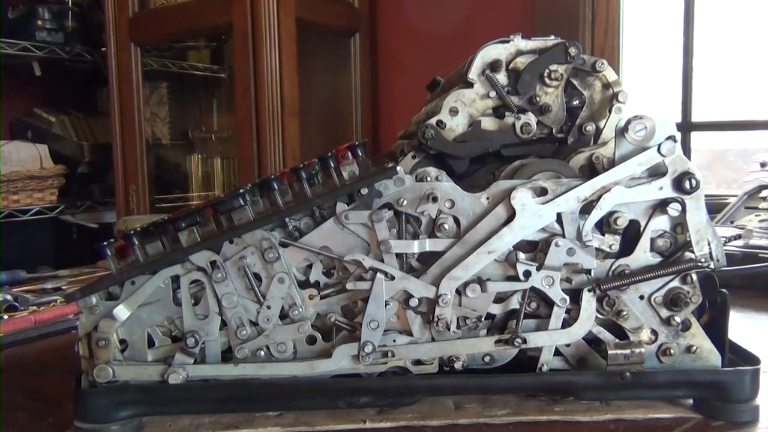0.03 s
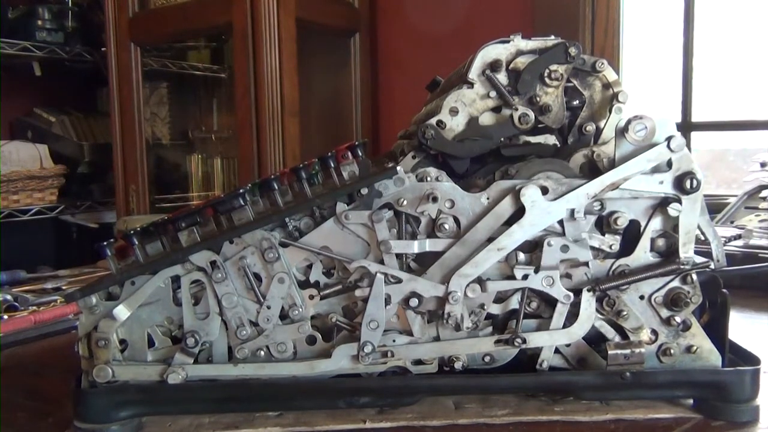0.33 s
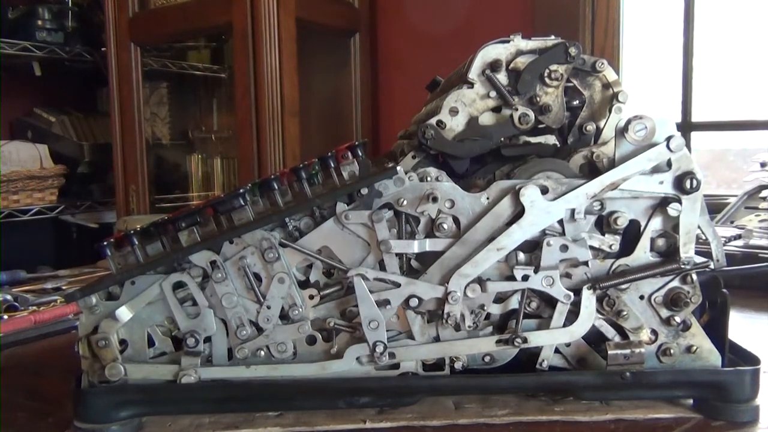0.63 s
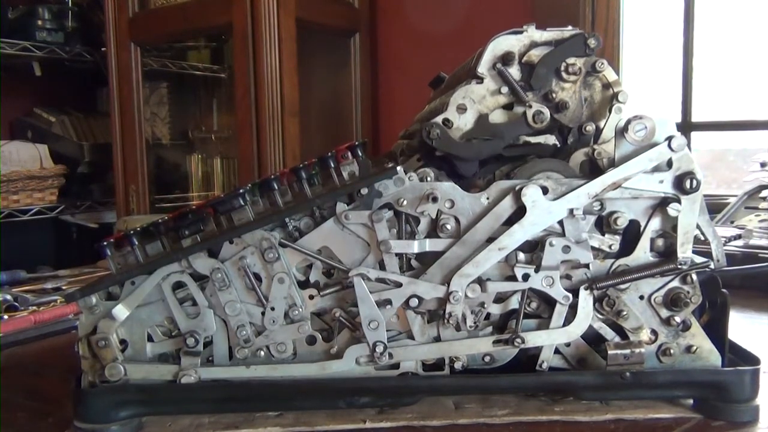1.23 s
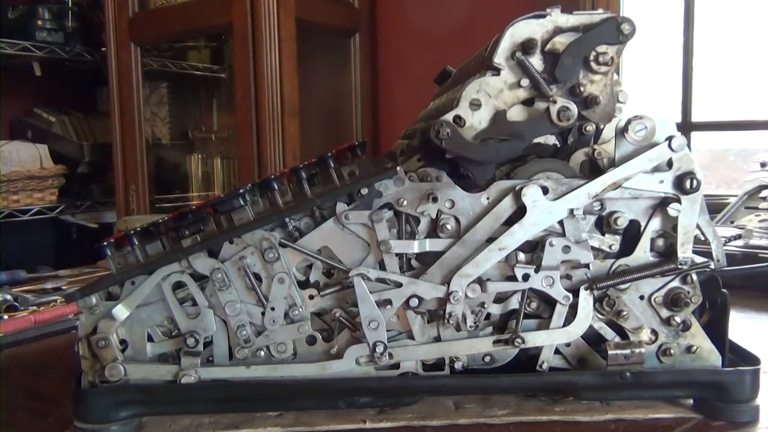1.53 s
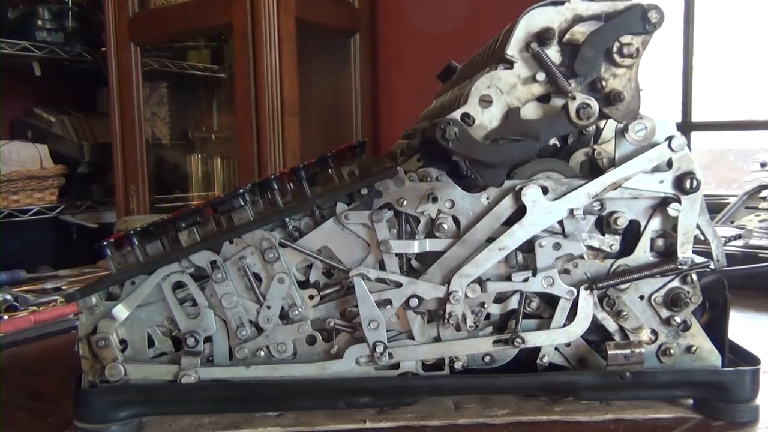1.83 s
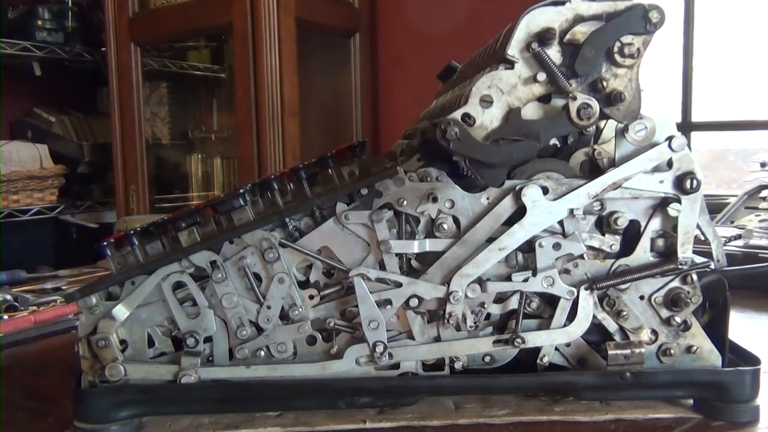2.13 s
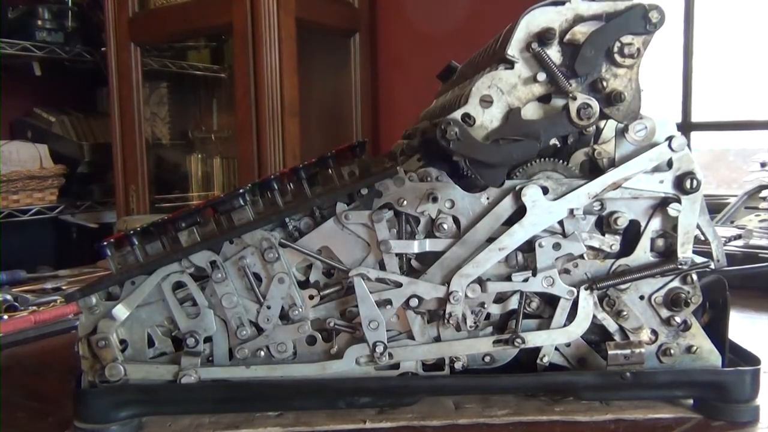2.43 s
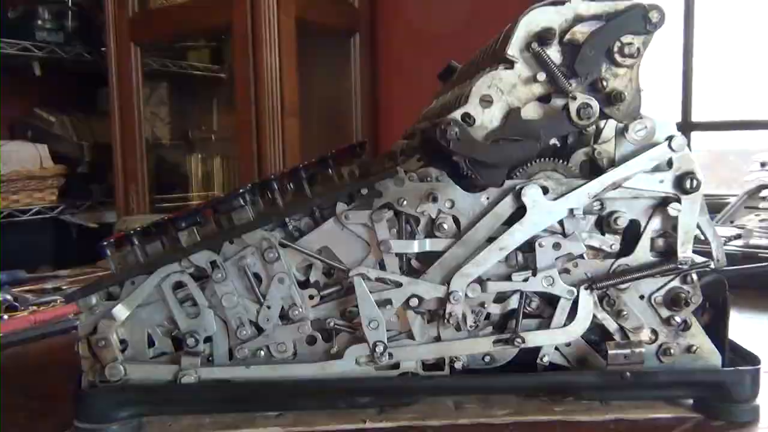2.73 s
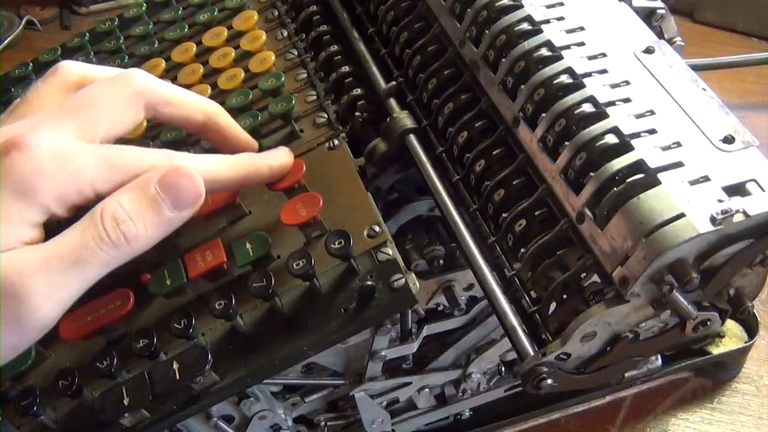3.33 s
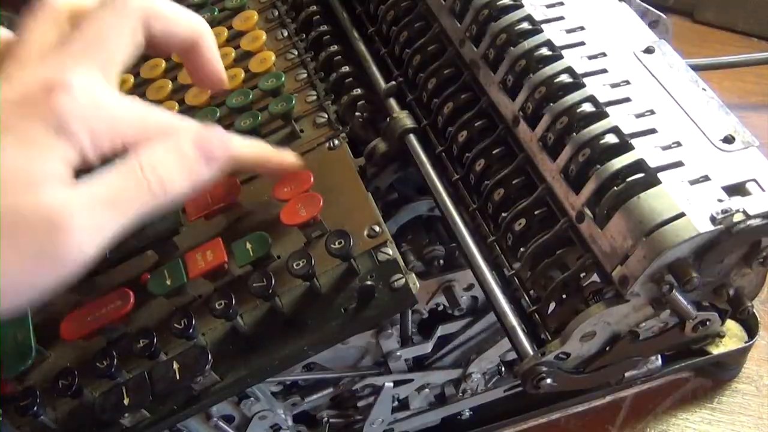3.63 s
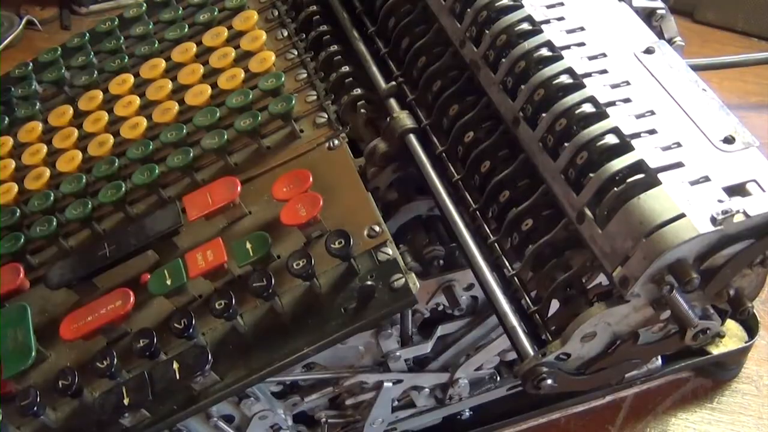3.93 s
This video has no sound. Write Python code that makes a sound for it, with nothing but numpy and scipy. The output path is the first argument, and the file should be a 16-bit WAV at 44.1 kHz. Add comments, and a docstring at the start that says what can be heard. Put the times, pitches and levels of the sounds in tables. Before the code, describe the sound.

A motor-driven mechanical calculator clatters close by in a quiet room, with snapping latches, knocking levers and churning gears. It winds down with ratchet ticks and a faint falling whine, pauses, then clatters again after a key press.

```python
"""Four quick counting strokes from a motor-driven mechanical calculator, cover off, close, in a quiet room.
Pawls rattle over the number wheels, latches snap and levers hit their stops over churning gears and a
booming frame. The carriage cycles, then the drive coasts to rest on a ticking ratchet with a falling whine.
Heard next from above the keys instead of from the side, it is set off by a key press and clatters on."""
import sys
import numpy as np
from scipy import signal
from scipy.fft import rfft, irfft
from scipy.io import wavfile
from scipy.ndimage import uniform_filter1d

SR = 44100
rng = np.random.default_rng(int(sys.argv[2]) if len(sys.argv) > 2 else 0)


def master(y):
    """Save y as 16-bit WAV."""
    cut = np.clip(np.atleast_2d(y).T, -1, 1)
    pcm = np.round(cut * 32767)  # scale
    wavfile.write(sys.argv[1], SR, pcm.astype(np.int16))


N = 176400
T, HZ = np.arange(N) / SR, np.fft.rfftfreq(N, 1 / SR)
ABOVE_FROM_S = 2.826  # listener: side before, above after
PAN_DB, WIDTH = -0.95, 0.12

# counting strokes, carriage cycles (time [s], level [dB])
COUNT_STROKES = [(0.0322, -4.5), (0.0809, -2), (0.1331, -1.5), (0.1846, -1.5)]
CARRIAGE_CYCLES = [(1.1585, -0.5), (1.2631, 2), (1.3649, 2), (1.4671, 3), (1.5714, 3), (1.6751, 1.5),
                   (1.7741, 1)]
# runs of blows within each (delay [s], length [s], relative level [dB])
COUNT_RUNS = [(-.0055, 0.0022, -19), (0, 0.00082, -13.5), (0.014, 0.0068, -19.5), (0.018, 0.0055, -19.5)]
CARRIAGE_RUNS = [(0, .001, -17.5), (.0055, .002, -18), (0.0143, .001, -20), (.028, .004, -24.5),
                 (.037, .014, -24.5), (.066, .008, -22.5), (0.076, 0.012, -23)]
# pawls over the number wheels (time [s], length [s], relative level [dB])
PAWL_RUNS = [(.233, 0.017, -17.5), (.253, .03, -17), (.283, 0.033, -21.5), (.312, 0.065, -26),
             (.359, 0.0048, -17), (.425, 0.019, -21), (.45, 0.026, -20), (.478, 0.023, -20.5),
             (.503, 0.033, -17), (.538, 0.038, -21), (.572, 0.016, -21), (.599, 0.015, -19),
             (.639, 0.026, -20.5), (.684, 0.014, -21.5), (.793, 0.012, -17.5), (.806, 0.026, -22.5),
             (.829, 0.015, -18), (.848, 0.018, -25), (.867, 0.019, -23), (.983, 0.0069, -19.5),
             (1.032, 0.028, -18.5), (1.049, 0.014, -18.5), (1.078, 0.03, -22), (1.127, 0.021, -18.5),
             (1.85, 0.011, -20), (1.869, 0.0084, -16.5), (3.483, .004, -27.5), (3.494, 0.0054, -25.5),
             (3.5225, 0.021, -15), (3.554, 0.0086, -19), (3.569, 0.019, -19), (3.668, 0.042, -25.5),
             (3.704, 0.0042, -23.5), (3.752, 0.033, -19.5), (3.806, 0.031, -19.5), (3.839, 0.03, -16.5),
             (3.877, 0.032, -19.5), (3.908, 0.05, -19), (3.96, 0.0077, -22), (3.991, 0.012, -19.5)]
# latches snapping home (time [s], relative level [dB])
LATCH_SNAPS = [(0.306, -9), (0.3664, -6), (0.395, -14), (0.4168, 0.5), (0.4349, -10), (0.46, -3),
               (0.4659, -12), (0.5862, -1), (0.5892, -3), (0.625, -3), (0.636, 0.5), (0.6584, -15),
               (0.667, 0), (0.7128, -9.5), (0.7513, -12), (0.776, -10), (0.8016, -12), (0.815, -1),
               (0.8905, -12), (0.8992, -7), (0.9044, -17), (0.934, -13), (0.949, -4), (0.959, -15),
               (0.998, -13), (1.02, -0.5), (1.046, -12), (1.0877, -3), (1.299, -7), (1.342, -4),
               (1.8097, -4), (3.5129, -0.5), (3.6214, -14), (3.63, -2), (3.6424, -1.5), (3.7114, -4),
               (3.7203, -18), (3.7303, -7), (3.7415, -7), (3.7778, 1.5), (3.788, -4), (3.7978, -4),
               (3.9376, -9), (3.9427, -3), (3.949, -9), (3.973, 1)]
# steel spectra (frequency [Hz], relative gain [dB])
STEEL_SIDE_EQ = [(300, -18), (1200, -9), (2400, -11), (3600, -8), (4400, -7), (6000, -1.5), (7000, -1.5),
                 (7900, 3), (9200, 0.5), (10500, 1.5), (11700, 1), (13300, -3), (14500, -7), (16000, -12)]
STEEL_ABOVE_EQ = [(300, -8.5), (1200, -17.5), (2200, -13), (3400, -5.5), (4500, -5.5), (6000, -2.5),
                  (7200, -2.5), (8600, -1), (10000, 3), (11200, -1.5), (13000, -2), (14500, -7),
                  (16000, -14)]


def clatter(latch_db=-14, cycle_slip=.07, cycle_scatter_db=1.5):
    """Counting strokes, carriage cycles, pawls and latches strike small steel parts."""
    runs = PAWL_RUNS + [(s + delay, length, db + run_db)
                        for s, db in COUNT_STROKES for delay, length, run_db in COUNT_RUNS]
    for s, db in CARRIAGE_CYCLES:
        for delay, length, run_db in CARRIAGE_RUNS:
            slip, force = rng.standard_normal(2)
            runs.append((s + delay * (1 + cycle_slip * slip), length,
                         db + run_db + cycle_scatter_db * force))
    blows = [(s, db + latch_db) for s, db in LATCH_SNAPS]
    blows += [blow for run in runs for blow in rattle(*run)]
    steel = strike(blows, steel_parts(crack_s=0.00058, ring_t60_s=0.01, ring_db=-3.5, rise_s=0.0008))
    side = linkage(steel * (T < ABOVE_FROM_S), shiver_db=-9)
    above = linkage(steel * (T >= ABOVE_FROM_S), shiver_db=-6.5)
    return colour(side, STEEL_SIDE_EQ) + colour(above, STEEL_ABOVE_EQ)


def rattle(start_s, length_s, db, gap_s=.0024, scatter_db=2.5, fade_db=-3, trim_db=1, count=24):
    """Uneven run of fading blows; a very short run is one blow."""
    jitter, scatter = rng.uniform(-.5, .5, count), rng.standard_normal(count)
    later = np.arange(count) > 0
    delay_s = gap_s * (np.arange(count) + jitter * later)
    blow_db = db + trim_db + scatter_db * scatter * later + fade_db * delay_s / length_s
    return list(zip(start_s + delay_s, np.where(delay_s < length_s, blow_db, -np.inf)))


def steel_parts(crack_s, ring_t60_s, ring_db, rise_s, count=64, pan_scatter_db=1.5, size=2400):
    """Bank of parts, each answering a blow with a short crack and its own 26 modes."""
    t, bank = np.arange(size) / SR, []
    rise = 1 - np.exp(-(t / rise_s) ** 2)
    for _ in range(count):
        pitch, life, strength, phase = rng.random((4, 26, 1))
        hz, t60_s = 500 + 15500 * pitch, ring_t60_s * 2 ** (2 * life - 1)
        modes = strength ** 2 * amp(-60 * t / t60_s) * np.sin(2 * np.pi * (hz * t + phase))
        crack = rng.standard_normal((2, size)) * np.exp(-t / crack_s)
        ring = np.array([modes.sum(0), (modes * rng.choice([-1, 1], (26, 1))).sum(0)])
        mid, side = unit(crack * rise) + amp(ring_db) * unit(ring * rise)
        pan_db = PAN_DB - pan_scatter_db * rng.standard_normal()
        bank.append(unit(spread(mid, side, WIDTH)) * balance(pan_db) * np.sqrt(100 / size))
    return bank


def strike(blows, bank, delay_s=.0012):
    """Each blow (time [s], level [dB]) hits a random steel part and clicks 1.2 ms after its time."""
    out = np.zeros((2, N))
    for (s, db), k in zip(blows, rng.integers(0, len(bank), size=20000)):
        add(out, s + delay_s, amp(db) * bank[k])
    return out


def linkage(x, shiver_db, t60_s=0.045, size=3000):
    """Blows shiver through neighbouring rods and springs."""
    tail = spread(*rng.standard_normal((2, size)), WIDTH) * amp(-60 * np.arange(size) / SR / t60_s)
    shiver = signal.oaconvolve(x, tail / np.linalg.norm(tail[0]), axes=1)[:, :N]
    return (x + amp(shiver_db) * shiver) / np.sqrt(1 + amp(shiver_db) ** 2)


# lever blows, finger on the key (time [s], level [dB])
LEVER_BLOWS = [(.044, -26), (.102, -25.5), (.15, -26), (.2, -21), (.277, -20.5), (.332, -22), (.36, -27),
               (.558, -17), (.604, -26), (.688, -22), (.83, -20.5), (.982, -22), (1.129, -20.5),
               (1.264, -16), (1.30, -18.5), (1.469, -24), (1.54, -18.5), (1.643, -22.5), (1.742, -21),
               (1.776, -19), (3.574, -21.5), (3.705, -21.5), (3.714, -27), (3.778, -18.5), (3.889, -14),
               (3.915, -17)]
KEY_TOUCHES = [(3.453, -45)]
# ringing lever (frequency [Hz], level [dB], T60 [s])
LEVER_MODES = [(2380, -19, .055), (2490, -21, .055), (4950, -23, .07)]
# lever spectrum (frequency [Hz], relative gain [dB])
LEVER_EQ = [(150, -23), (500, -5), (1200, 1), (1800, 5.5), (2400, -2.5), (3600, 8), (5500, 0.5),
            (8000, -12), (16000, -35)]


def levers(clank_s=3.889):
    """Heavy levers hit their stops and a finger touches a key: dull blows. One lever rings on."""
    bank = steel_parts(crack_s=0.0036, ring_t60_s=0.066, ring_db=0, rise_s=0.00025, count=24)
    knocks = colour(strike(LEVER_BLOWS + KEY_TOUCHES, bank), LEVER_EQ)
    return knocks + ringing([(clank_s, 0)], LEVER_MODES)


# ratchet ticks (time [s], relative level [dB])
RATCHET_TICKS = [(1.9243, -18.5), (1.9347, -21), (1.939, -26), (1.945, -18), (1.9531, -23), (1.9663, -20),
                 (1.9747, -21), (1.996, -25), (2.0005, -22), (2.005, -22), (2.0091, -20), (2.0142, -20),
                 (2.029, -21), (2.0336, -20.5), (2.0406, -21), (2.057, -24), (2.0603, -27), (2.0682, -26),
                 (2.075, -31), (2.0888, -24), (2.097, -20), (2.1032, -25), (2.1207, -22), (2.1289, -19.5),
                 (2.1368, -26), (2.14, -21.5), (2.1464, -33), (2.1592, -36), (2.1661, -36), (2.1732, -25.5),
                 (2.1805, -32), (2.1866, -27), (2.1902, -26), (2.1938, -27), (2.2028, -27), (2.216, -21),
                 (2.2274, -23), (2.2364, -30), (2.2502, -20), (2.2595, -25), (2.2688, -34), (2.277, -30),
                 (2.2844, -32), (2.2881, -24.5), (2.294, -21), (2.3164, -37), (2.325, -37), (2.335, -31),
                 (2.3468, -28), (2.36, -28), (2.3704, -37), (2.3918, -26.5), (2.4026, -36)]
# tick spectrum (frequency [Hz], relative gain [dB])
TICK_EQ = [(500, -11.5), (2500, -27), (3700, -3.5), (4100, -12), (4450, -3), (5000, -7), (5740, -1.5),
           (6800, -8), (7520, 1.5), (8700, 2.5), (9600, -9), (10600, -6), (12000, -10), (13100, -14),
           (14000, -12), (15000, -31)]
# pawl ring (frequency [Hz], level [dB], T60 [s])
RATCHET_MODES = [(5720, -22, .02), (7600, -15, 0.024)]


def ratchet(crack_s=0.00053, rise_s=.0003, crack_db=14.5, size=512):
    """One light pawl ticks and rings as the shaft coasts."""
    t, ticks = np.arange(size) / SR, np.zeros((2, N))
    envelope = np.exp(-t / crack_s) * (1 - np.exp(-(t / rise_s) ** 2))
    for s, db in RATCHET_TICKS:
        spectrum = rfft(rng.standard_normal((2, size)) * envelope)
        crack = irfft(spectrum / abs(spectrum))[:, :size // 2]  # whitened: same colour every tick
        add(ticks, s, amp(db + crack_db) * spread(*crack, WIDTH))
    cracks = colour(linkage(ticks, shiver_db=-9), TICK_EQ)
    return (cracks + ringing(RATCHET_TICKS, RATCHET_MODES)) * balance(2 * PAN_DB)


# gear churn, one list per motor run (time [s], level [dB])
GEAR_LEVELS = [
    [(0, -24.5), (.22, -27), (.3, -27.5), (.37, -26.5), (.39, -29), (.45, -27.5), (.66, -26.5), (.73, -30),
     (.775, -29), (.8, -28), (.86, -27), (.94, -25.5), (1.015, -33), (1.06, -28.5), (1.12, -22.5),
     (1.85, -23.5), (1.91, -27.5), (2, -31.5), (2.15, -36), (2.3, -42.5), (2.42, -50), (2.46, -80)],
    [(3.478, -56), (3.485, -27.5), (3.505, -32.5), (3.53, -28), (3.63, -23), (3.71, -24.5), (3.74, -30.5),
     (3.8, -25), (3.9, -25.5), (3.955, -30.5), (4, -21.5)],
]
# gear spectra (frequency [Hz], relative gain [dB])
GEAR_SIDE_EQ = [(100, -18), (350, -10.5), (480, -4), (600, 0), (750, -2.5), (1200, 0.5), (1850, 0.5),
                (2250, -4), (2700, -2.5), (3500, 2.5), (4300, -0.5), (5800, 3), (6900, 1.5), (7700, 5),
                (9600, -1), (11000, 1.5), (13000, -9), (15000, -12), (16000, -22)]
GEAR_ABOVE_EQ = [(100, -5), (400, 4), (750, -1), (1250, 4.5), (2000, -3), (2500, -1.5), (3400, 6),
                 (4500, -1), (6000, 2), (7200, -1), (8200, 6.5), (10000, 0), (11500, 3.5), (13000, -1),
                 (14500, -8), (16000, 2.5)]
# dulling of the slowing gears (time [s], treble lost [0-1])
TREBLE_LOSS = [(1.88, 0.13), (2.05, 0.47), (2.3, 0.9)]


def gears(contacts_per_s=3200, scatter_db=4.5, treble_hz=2630, count=20000):
    """Dense tooth and link contacts merge into a churn, duller as the shaft slows."""
    gap, force = rng.random((count, 2)).T
    times_s = np.cumsum(2 * gap / contacts_per_s)
    contact_db = scatter_db * np.minimum(-np.log(1 - force), 3)
    bank = steel_parts(crack_s=0.00062, ring_t60_s=0.017, ring_db=-2.5, rise_s=0.00017, count=72)
    contacts = unit(strike(zip(times_s, contact_db), bank))
    churn = colour(contacts, GEAR_SIDE_EQ)
    treble = churn - signal.filtfilt(*signal.butter(3, treble_hz, fs=SR), churn)
    side = churn - np.interp(T, *np.transpose(TREBLE_LOSS)) * treble
    above = colour(contacts, GEAR_ABOVE_EQ)
    return side * level(GEAR_LEVELS[0]) + above * level(GEAR_LEVELS[1])


# drive gear (time [s], tooth rate [Hz], level [dB])
DRIVE_MESH = [(1.08, 1150, -58), (1.8, 1198, -44), (1.88, 1150, -51), (1.95, 1018, -42), (2.01, 906.6, -44),
              (2.05, 852, -43), (2.085, 768, -57), (2.131, 691, -44.5), (2.18, 597.6, -57),
              (2.24, 506.4, -58), (2.42, 298, -72)]
# its partials (multiple of tooth rate, relative level [dB])
DRIVE_PARTIALS = [(.5, -14), (1, -3.5), (1.5, -4), (2, -3), (2.5, -3.5), (3, -10)]
# side plate resonance (frequency [Hz], gain [dB])
PLATE_EQ = [(1300, 2.5), (1750, 4), (1950, 1), (2150, -3), (3000, -9)]
# groan through a frame resonance (time [s], level [dB])
GROAN_LEVELS = [(2.12, -60), (2.2, -47), (2.25, -39), (2.31, -55), (2.42, -71)]


def drive_whine(waver=.017, flutter=.85):
    """Gear partials sink through the side plate's resonance; the frame groans at half the tooth rate."""
    s, hz, db = np.transpose(DRIVE_MESH)
    tooth_hz = np.interp(T, s, hz) * (1 + waver * drift(size=250))
    phase = 2 * np.pi * np.cumsum(tooth_hz) / SR
    tone = np.zeros(N)
    for k, partial_db in DRIVE_PARTIALS:
        gain = amp(partial_db + at_hz(PLATE_EQ, k * tooth_hz))
        tone += gain * (1 + flutter * drift(size=550)) * np.sin(k * phase)
    whine = level(list(zip(s, db))) * tone / np.sqrt(1 + flutter ** 2)
    return whine + level(GROAN_LEVELS) * np.sin(phase / 2)


# frame shake, one list per motor run (time [s], level [dB])
FRAME_LEVELS = [
    [(0.0, -35), (0.04, -39.5), (0.22, -38.5), (0.26, -48.5), (0.34, -25), (0.4, -37), (0.52, -33.5),
     (0.62, -42), (0.66, -32), (0.78, -38.5), (0.81, -47), (0.84, -39), (0.89, -34.5), (1.06, -43),
     (1.1, -32.5), (1.86, -32.5), (1.88, -37), (1.95, -36), (2.01, -44.5), (2.18, -52), (2.24, -48),
     (2.42, -52)],
    [(3.49, -62), (3.544, -35), (3.6, -28), (3.722, -41), (3.798, -38), (3.826, -26), (3.87, -35.5),
     (3.906, -25), (3.956, -38), (3.97, -25), (4.0, -44)],
]
# frame resonances (frequency [Hz], width [Hz], relative level [dB])
FRAME_RESONANCES = [(89.6, 8.4, -1), (131, 12.2, -1), (167.5, 32, -3.5), (213, 17, -4), (238, 25, -3.5),
                    (262, 28, -6.5), (328, 25, -0.5), (387, 22, -5.5)]


def frame(low_hz=76, high_hz=410, boom_db=-0.4, motor_hz=213.4, drone_db=-5.5, shaft_wobble=.011):
    """The frame booms at its resonances and drones with the motor."""
    power = sum(amp(db) ** 2 / (1 + (2 * (HZ - hz) / width) ** 2) for hz, width, db in FRAME_RESONANCES)
    power = power / (1 + (low_hz / (HZ + 1)) ** 12) / (1 + (HZ / high_hz) ** 6)
    boom = noise(np.sqrt(power), width=0.076)
    boom /= np.sqrt(uniform_filter1d((boom ** 2).mean(0), size=1400))  # steady level
    drone_hz = motor_hz * (1 + shaft_wobble * drift(size=1500))
    drone = np.sqrt(2) * np.sin(2 * np.pi * np.cumsum(drone_hz) / SR)
    shake = amp(boom_db) * boom + amp(drone_db) * drone
    return shake * sum(level(run) for run in FRAME_LEVELS) * balance(1.2)


def table_sway(start_s=1.08, hz=37, db=-42, t60_s=1.2):
    """The table sways as the carriage starts."""
    t = np.maximum(T - start_s, 0)
    return amp(db - 60 * t / t60_s) * np.sin(2 * np.pi * hz * t)


# loose part's taps (time [s], level [dB])
LOOSE_TAPS = [(2.674, -48.5), (2.69, -54), (2.742, -60)]
# its ring (frequency [Hz], relative level [dB], T60 [s])
LOOSE_MODES = [(3050, -6, 0.049), (3220, 4, 0.045), (6500, -6, .03), (11200, -1, .03)]


def loose_part():
    """A loose part settles and rings in the pause."""
    return ringing(LOOSE_TAPS, LOOSE_MODES)


# room decay (frequency [Hz], T60 [s])
ROOM_DECAY = [(200, 0.15), (1500, 0.2), (5000, 0.13), (14000, 0.14)]


def room(x, wet_db=-14.5, predelay_s=.004, size=16384):
    """Short tail of a small furnished room."""
    hz, t, spectra = signal.stft(rng.standard_normal((2, size)), SR, nperseg=256)
    decay = amp(-60 * t / at_hz(ROOM_DECAY, hz)[:, None])
    tail = signal.istft(spectra * decay, SR, nperseg=256)[1]
    tail = spread(*tail, width=0.99) * (np.arange(tail.shape[1]) > predelay_s * SR)
    return amp(wet_db) * signal.fftconvolve(x, tail / np.linalg.norm(tail[0]), axes=1)[:, :N]


# stereo width (frequency [Hz], side gain [dB])
WIDTH_EQ = [(500, -0.5), (1100, 1), (2200, -31), (4000, -4.5), (8000, 3), (13000, 3.5)]
# stereo lean (frequency [Hz], left over right [dB])
LEAN_EQ = [(500, 0.48), (2000, -0.015), (4500, -0.93), (12000, -0.4)]


def stereo_image(x):
    """Treble comes from all over the machine, the midrange from its centre."""
    left, right = rfft(x)
    mid, side = (left + right) / 2, (left - right) / 2 * amp(at_hz(WIDTH_EQ, HZ))
    return irfft(np.array([mid + side, mid - side]) * balance(at_hz(LEAN_EQ, HZ)), N)


# room tone spectra (frequency [Hz], relative gain [dB])
AIR_SIDE_EQ = [(15, -28), (25, -7), (48, -10), (59, -16.5), (137, -6.5), (157, -10.5), (416, -14.5),
               (624, -18), (2690, -28), (3160, -29), (4030, -28), (13200, -32), (16000, -30)]
AIR_ABOVE_EQ = [(15, -33), (25, -8), (48, -4), (66, -20), (92, -6), (293, -6.5), (354, -13), (545, -12.5),
                (863, -15.5), (3250, -24), (3720, -23), (11000, -26.5), (16000, -26.5)]
# hum (frequency [Hz], level [dB])
HUM_TONES = [(102.3, -67), (360.7, -57.5), (419.9, -67), (479.1, -67), (839.8, -68.5)]


def room_tone(side_db=-52, above_db=-48.5, whistle_hz=3660, half_width_hz=120, whistle_db=-64.5):
    """Soft noise with a thin whistle; a hum joins above the keys."""
    side = amp(side_db) * noise(amp(at_hz(AIR_SIDE_EQ, HZ)), width=0.4)
    above = amp(above_db) * noise(amp(at_hz(AIR_ABOVE_EQ, HZ)), width=0.43)
    hum = sum(amp(db) * np.sqrt(2) * np.sin(2 * np.pi * (hz * T + rng.random())) for hz, db in HUM_TONES)
    whistle = amp(whistle_db) * noise(1 / (1 + ((HZ - whistle_hz) / half_width_hz) ** 2), width=0.67)
    return np.where(T < ABOVE_FROM_S, side, above + hum) + whistle


def ringing(blows, modes, size=8000):
    """One part's decaying modes, struck at each (time [s], level [dB])."""
    t, out = np.arange(size) / SR, np.zeros((2, N))
    ring = sum(amp(db - 60 * t / t60_s) * np.sin(2 * np.pi * hz * t) for hz, db, t60_s in modes)
    for s, db in blows:
        add(out, s, amp(db) * np.array([ring, ring]))
    return out


def colour(x, eq, size=2048):
    """Minimum-phase filter of unit energy."""
    log_gain = np.log(amp(at_hz(eq, abs(np.fft.fftfreq(size, 1 / SR)))))
    taps = np.fft.ifft(np.exp(np.conj(signal.hilbert(log_gain)))).real
    return signal.oaconvolve(x, taps[None] / np.linalg.norm(taps), axes=1)[:, :N]


def noise(gain, width):
    """Stereo noise, rms 1, shaped by gain per frequency."""
    return unit(spread(*irfft(rfft(rng.standard_normal((2, N))) * gain, N), width))


def drift(size):
    """Smooth noise, rms 1, changing over about size samples."""
    return unit(uniform_filter1d(uniform_filter1d(rng.standard_normal(N), size), size))


def level(points):
    """Envelope from (time [s], level [dB]), fading to silence outside."""
    s, db = np.transpose(points)
    fade_in, fade_out = np.clip((T - s[0]) / .01 + 1, 0, 1), np.clip((s[-1] - T) / .02 + 1, 0, 1)
    return amp(np.interp(T, s, db)) * fade_in * fade_out


def at_hz(points, hz):
    """Table lookup on a log-frequency axis."""
    table_hz, value = np.transpose(points)
    return np.interp(np.log(hz + 1), np.log(table_hz + 1), value)


def add(mix, s, sound):
    """Mixes a stereo sound in at time s."""
    part = mix[:, max(round(s * SR), 0):][:, :sound.shape[1]]
    part += sound[:, :part.shape[1]]


def spread(mid, side, width):
    """Mid and side to left and right."""
    return np.array([mid + width * side, mid - width * side]) / np.sqrt(1 + width ** 2)


def balance(db):
    """Channel gains, left over right by db."""
    return amp(db * np.array([[.5], [-.5]]))


def amp(db):
    """Decibels to gain."""
    return 10 ** (np.asarray(db) / 20)


def unit(x):
    """Scales to rms 1."""
    return x / np.sqrt(np.mean(abs(x) ** 2) + 1e-20)


def scene():
    """The calculator in its room."""
    steel = clatter() + levers() + ratchet() + gears() + drive_whine() + loose_part()
    return stereo_image(steel + room(steel)) + frame() + table_sway() + room_tone()


def record(dry, dip_s=0.0085, dip_depth=0.94, ceiling=.76, cutoff_hz=15900):
    """Brief dip at the change of position, soft peak limit, low-pass."""
    dipped = dry * (1 - dip_depth * np.exp(-((T - ABOVE_FROM_S + dip_s) / dip_s) ** 2))
    limited = dipped / (1 + (dipped / ceiling) ** 4) ** .25
    lowpass = signal.firwin(401, cutoff_hz, window=("kaiser", 8), fs=SR)
    return signal.oaconvolve(limited, lowpass[None], "same")


dry = scene()
out = record(dry)
master(out)
```